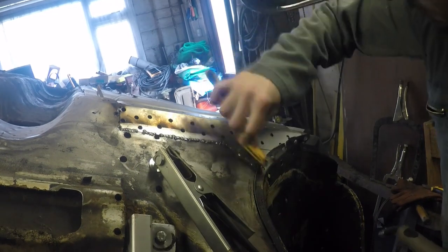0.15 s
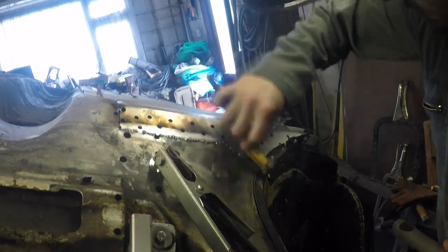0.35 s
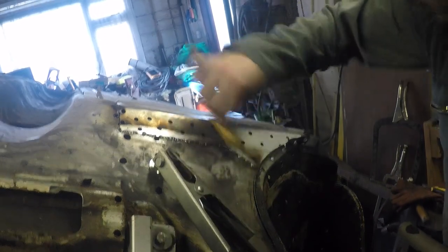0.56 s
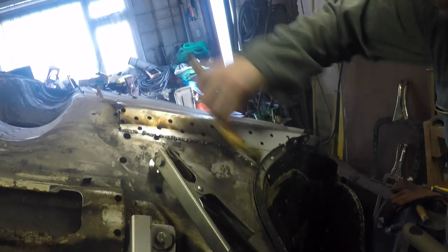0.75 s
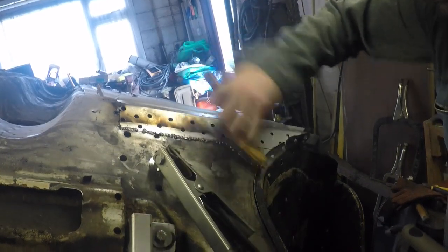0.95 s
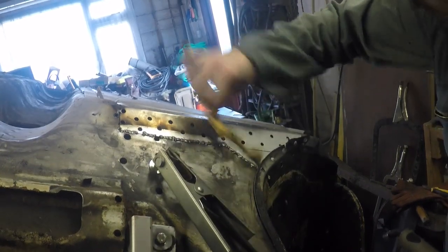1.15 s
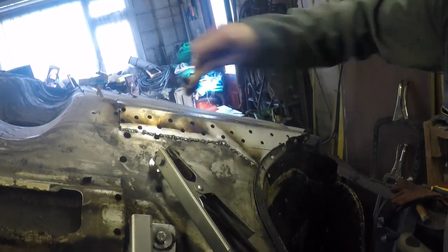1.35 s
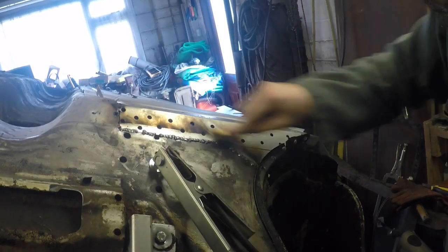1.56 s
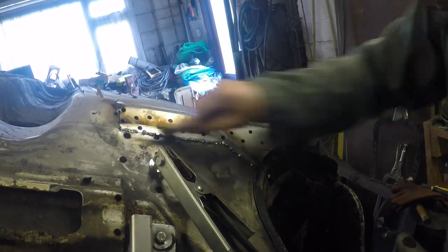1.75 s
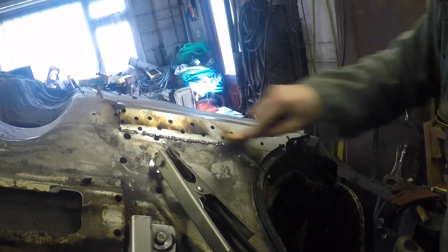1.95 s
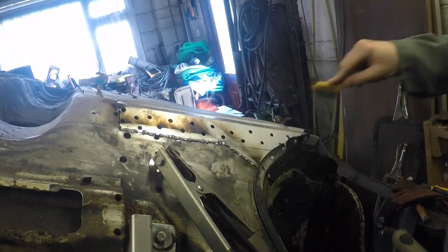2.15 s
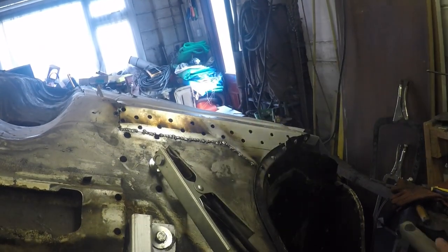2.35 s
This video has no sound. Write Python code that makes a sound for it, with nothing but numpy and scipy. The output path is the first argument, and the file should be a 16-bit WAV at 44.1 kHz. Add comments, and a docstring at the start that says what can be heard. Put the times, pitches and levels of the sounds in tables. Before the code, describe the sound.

A wire brush scrubs quickly over a steel panel, hissing with low metal booms.

```python
"""Wire brush on a steel panel

A hand wire brush scrubs a weld seam on a large steel panel in two bouts, then grazes it once more.
The wire tips pluck the steel so densely that they hiss through its upper resonances. Each turn of the
hand thumps the panel, whose low boom reaches the microphone through the structure.
A faint electrical whine and room rumble lie under it."""
import sys
import numpy as np
from scipy import signal
from scipy.fft import rfft, irfft, next_fast_len
from scipy.io import wavfile
from scipy.ndimage import uniform_filter1d, map_coordinates

SR = 44100
rng = np.random.default_rng(int(sys.argv[2]) if len(sys.argv) > 2 else 0)


def dump(signal):
    """Clip the signal to [-1, 1] and save it as 16-bit WAV at the path in sys.argv[1]."""
    limited = np.clip(np.atleast_2d(signal).T, -1, 1)
    pcm = np.round(limited * 32767).astype(np.int16)
    wavfile.write(sys.argv[1], SR, pcm)


N = 110250

# Course of the scrubbing. Each row: time in seconds, hiss level in dB, relative mid ring in dB.
STROKES = [(0.15, -56.5, -4.5), (0.17, -55.5, -5), (0.18, -53, -6), (0.19, -57, -3), (0.33, -52.5, -6.5),
           (0.45, -55, -3), (0.921, -54.5, -5), (0.931, -51.5, -12), (0.95, -54.5, -3.5),
           (1.01, -54.5, -3.5), (1.089, -53.5, -9), (1.099, -53, -6), (1.14, -54, -4), (1.3, -54.5, -5),
           (1.391, -58.5, -8), (1.42, -76, 5), (1.459, -78, -8), (1.525, -65.5, -2), (1.535, -57, -10),
           (1.59, -52, -3.5), (1.61, -57.5, 3), (1.62, -52.5, -8.5), (1.65, -57.5, -2), (1.66, -55.5, -9),
           (1.68, -51, -4), (1.69, -55, 3), (1.71, -54.5, -6.5), (1.75, -51.5, -10.5), (1.77, -49, -3),
           (1.79, -54, -5.5), (1.84, -52, -6.5), (1.84, -48, -3), (1.869, -50.5, -7.5), (1.91, -57.5, -1.5),
           (1.95, -52.5, -13), (1.969, -52.5, -5), (2.01, -50, -3.5), (2.04, -58, -2), (2.05, -54, -4),
           (2.08, -53.5, -8), (2.12, -54, -6), (2.14, -49, -4), (2.184, -47.5, -0.5), (2.22, -84, 9),
           (2.26, -88, 17)]
# The brush halts to turn. Each row: time in seconds, depth of the dip in dB.
HALT_DIPS = [(.38, 2), (0.754, 4.5), (.92, 0.5), (1.065, 4), (1.151, 6), (1.235, 0), (1.565, 6), (1.61, 3),
             (1.65, 1), (1.695, 4), (1.742, 2), (1.791, 1.5), (1.845, 8.5), (1.905, 4), (1.972, 6),
             (2.04, 0.5), (2.113, 5)]
# Drive of the low modes. Each row: time in seconds, level in dB.
RUMBLE_DRIVE = [(0.0, -37), (0.01, -49.5), (0.19, -49.5), (0.25, -42.5), (0.46, -39), (0.58, -45.5),
                (0.6, -51), (0.62, -44.5), (1.1, -41), (1.12, -45), (1.24, -42.5), (1.47, -49.5),
                (1.83, -42), (1.87, -42), (1.91, -47.5), (1.92, -34.5), (1.93, -44), (1.96, -39),
                (2.07, -48), (2.08, -37), (2.17, -40.5), (2.19, -34.5), (2.21, -42.5), (2.28, -41),
                (2.3, -42), (2.5, -74)]
# Panel modes in four registers. Each row: frequency in Hz, bandwidth in Hz, gain in dB.
HIGH_MODES = [(3613, 360, -5.5), (4410, 170, -8), (5300, 440, -15), (5900, 150, -6), (6290, 190, -6),
              (7420, 150, -8.5), (8180, 430, -7), (9120, 380, -8), (10440, 360, -11), (12100, 320, -6),
              (12340, 510, -2.5), (12800, 500, -18), (15100, 390, -10)]
MID_MODES = [(1080.4, 28, -1), (1298, 49, -3), (1401, 46, -1), (1486, 27, 6), (1541, 20, 2.5),
             (1642, 14.4, 4.5), (1758, 11, 0.5), (1860, 50, -5.5), (2048, 55, -2), (2191, 42, 2),
             (2333, 60, 3), (2450, 38, -5), (2581, 38.4, 5.5)]
LOW_MODES = [(50, 6.3, -10.5), (84.4, 14.3, -2.5), (201.2, 6.3, 0.5), (224.3, 9, -0.5), (253.1, 7.3, 2.5),
             (303.4, 8.1, 0.5), (329.9, 6.5, 1), (356.8, 7.2, 1.5), (394.1, 9.6, -5), (456.6, 33, -17),
             (517.7, 6.9, -6), (564, 22, -17.5), (675.6, 10.2, -11), (722.5, 24, -17), (764.4, 15, -16.5)]
BOOM_MODES = [(107.8, 8.5, -6), (128, 6.45, -0.5), (146.1, 6.05, 0)]
# Bristle spectrum, and its change once the brush is sideways. Each row: frequency in Hz, gain in dB.
BRISTLE_SPECTRUM = [(1530, -10), (2600, -21), (3000, -19.5), (3560, -3), (5000, -10), (6220, -1.5),
                    (6960, -16.5), (8080, -10), (10900, -12), (12500, 5), (15700, -9)]
SIDEWAYS_COLOUR = [(3000, 1.5), (4200, 2), (5200, 3), (6000, -2), (6500, 3.5), (7300, 0), (9000, 0.5),
                   (11600, 3.5), (12500, -1), (15000, 1.5)]
# Turns of the hand. Each row: start in seconds, relative boom level in dB, boom pitch in Hz,
# relative thud level in dB, boom T60 in seconds, lead of the damping in seconds.
HAND_TURNS = [(0.101, -27.5, 153.1, -52, 0.12, 0.012), (0.169, -33.5, 131.2, -54, 0.83, 0.013),
              (0.202, -27.5, 132.8, -63, 1, 0.013), (0.258, -24.5, 130.9, -40, 1, 0.0089),
              (0.31, -19.5, 127.5, -31, 0.7, 0.0091), (0.376, -18, 128.3, -50, 0.32, 0.043),
              (0.44, -15, 136.4, -27, 0.16, 0.029), (0.478, -19.5, 125.2, -48, 0.49, 0.01),
              (0.537, -19, 137.8, -33, 0.57, 0.0097), (0.595, -21.5, 131.8, -54, 1, 0.016),
              (0.639, -22.5, 121.9, -56, 1, 0.015), (0.689, -19, 133.9, -30.5, 0.4, 0.021),
              (0.74, -27.5, 121.8, -41, 0.47, 0.012), (0.805, -12.5, 137.3, -35, 0.17, 0.023),
              (0.857, -14, 136.6, -31, 0.23, 0.031), (0.918, -17, 140.7, -29, 0.22, 0.0055),
              (0.972, -13, 132.4, -41, 0.16, 0.034), (1.029, -22.5, 133, -28, 0.22, 0.0075),
              (1.077, -13, 127.3, -41, 0.23, 0.029), (1.138, -17.5, 137.7, -28, 0.42, 0.0054),
              (1.195, -29.5, 127, -29.5, 0.28, 0.0077), (1.256, -17.5, 140.5, -53, 0.34, 0.0082),
              (1.312, -23, 135.2, -31.5, 0.37, 0.018), (1.4, -30, 139.5, -31.5, 0.33, 0.015),
              (1.485, -32.5, 142.3, -39, 0.42, 0.015), (1.571, -34.5, 142.7, -38, 0.75, 0.0097),
              (1.618, -33, 115.5, -35.5, 0.54, 0.0072), (1.725, -46, 148.1, -31.5, 0.61, 0.014),
              (1.812, -29, 125.9, -38, 0.33, 0.018), (1.922, -21.5, 121.1, -37, 0.43, 0.033),
              (1.945, -28, 152.4, -55, 0.29, 0.011), (2.05, -32.5, 117, -37, 0.58, 0.0092),
              (2.077, -36.5, 150, -54, 0.36, 0.016), (2.185, -22, 140, -69, 0.66, 0.033),
              (2.225, -35, 121.8, -57, 0.49, 0.012), (2.3, -28.5, 140.4, -42, 0.19, 0.017),
              (2.366, -40.5, 113.4, -42, 0.4, 0.014)]
# Single modes caught by a wire. Each row: start in seconds, frequency in Hz, level in dB.
CAUGHT_MODES = [(1.632, 1475, -50.5), (1.757, 1490, -43.5), (1.86, 2560, -52), (2.182, 2357, -42.5),
                (2.315, 1760, -46.5)]
# Two lists: a faint opening scrape; then the rasp of the last stroke and a light closing graze.
# Each row: time in seconds, level in dB.
SCRAPE_ENVELOPES = [
    [(0.0, -58), (0.036, -80), (0.054, -83), (0.08, -88)],
    [(2.13, -81), (2.175, -52), (2.195, -54), (2.214, -70), (2.26, -89), (2.272, -57.5), (2.298, -61.5),
     (2.312, -51.5), (2.332, -51.5), (2.386, -103), (2.4, -89)],
]
# Resonances of the scrapes. Each row: frequency in Hz, bandwidth in Hz, gain in dB.
SCRAPE_MODES = [(2250, 60, -6), (3500, 450, -5), (4800, 170, -2), (6300, 150, -2), (7700, 150, -4),
                (9700, 200, -10)]
# Friction noise of the scrapes. Each row: frequency in Hz, relative density in dB.
SCRAPE_SPECTRUM = [(530, -18), (900, 0.5), (2260, -0.5), (2700, -8), (3520, 4.5), (5600, -29), (7000, -37),
                   (15700, -48)]
# The brush back on steel. Each row: frequency in Hz, level in dB, T60 in seconds.
KNOCK_MODES = [(300, -24.5, 0.1), (510, -34, .06), (757, -40.5, 0.17)]
# Background noise. Each row: frequency in Hz, relative density in dB.
ROOM_SPECTRUM = [(18, -52), (50, -5.5), (90, -14.5), (140, -2), (400, -23), (625, -35.5), (813, -41),
                 (1270, -49), (7800, -56), (8500, -45.5), (9200, -54.5), (11700, -48), (12500, -47),
                 (13300, -47), (15700, -63)]
# Electrical tones. Each row: frequency in Hz, relative level in dB.
WHINE_TONES = [(2116, -78), (6352, -87)]

TOUCH_S, SIDEWAYS_S, KNOCK_S = 0.1468, 1.47, 2.181
PLUCKS_PER_S, PLUCK_SPREAD_DB, FLUTTER_DB = 6000, 4, 0.5
TIME = np.arange(N) / SR


def bristle_hiss():
    """Shot noise: dense plucks of the wire tips merge into a hiss, filtered by the upper modes."""
    sizes = amp(PLUCK_SPREAD_DB * np.minimum(rng.exponential(size=N), 4.5))
    plucks = (rng.random(N) < PLUCKS_PER_S / SR) * sizes * rng.choice([-1, 1], N)
    tips = unit(unit(plucks) + 1.9 * rng.standard_normal(N)) * amp(FLUTTER_DB * wobble(44.58))
    hiss = blended(tips, HIGH_MODES) + amp(-7.5) * coloured(tips, BRISTLE_SPECTRUM)
    hiss = wandering_contact(fine_modes(hiss))
    # In the second bout the brush is turned and its wires catch in spurts.
    sideways = unit(coloured(hiss, SIDEWAYS_COLOUR) * amp(wobble(82)))
    return np.where(TIME < SIDEWAYS_S, hiss, sideways)


def fine_modes(x, spacing_hz=25, spread_db=2):
    """High modal density: the sheet's countless small modes give a jagged, random response."""
    knots = rng.standard_normal(SR)
    return unit(filtered(x, lambda hz: amp(spread_db * map_coordinates(knots, [hz / spacing_hz]))))


def wandering_contact(x, spread_db=1):
    """Coupling depends on where the wires land, so patches of gain wander over time and frequency."""
    spectra = signal.stft(x, nperseg=256)[2]
    patches = uniform_filter1d(rng.standard_normal(spectra.shape), size=4, axis=0)
    patches = uniform_filter1d(patches, size=8, axis=1)
    return unit(signal.istft(spectra * amp(spread_db * unit(patches)), nperseg=256)[1][:N])


def scrubbing():
    """Forced vibration: the strokes set the level of the hiss and drive the mid and low modes."""
    hiss_db, ring_db = curves([(TOUCH_S, *STROKES[0][1:])] + list(STROKES))
    hiss_db -= sum(db * np.exp(-((TIME - at) / 0.0055) ** 2) for at, db in HALT_DIPS)
    rumble_db, = curves(RUMBLE_DRIVE)
    hiss = amp(hiss_db) * bristle_hiss()
    ring = driven(MID_MODES, hiss_db + ring_db - 1 + FLUTTER_DB * wobble(30.2))
    rumble = driven(LOW_MODES, rumble_db + 0.95 * wobble(23.28))
    boom = driven(BOOM_MODES, rumble_db - 1)
    return hiss + ring + rumble + boom


def panel_booms(rise_s=0.008, damp_s=0.023, longest_s=0.086, glide_hz=8):
    """Contact damping: each turn of the hand swells a boom of rising pitch, damped as the next nears."""
    starts, db, hz, _, t60, lead = np.transpose(HAND_TURNS)
    lengths = np.minimum(np.diff(starts, append=N / SR), longest_s)
    envelope, t = np.zeros(N + SR), np.arange(SR // 2) / SR
    for k, start in enumerate(starts):
        damped_for = np.maximum(t - lengths[k] + lead[k] - rise_s, 0)
        damping = np.exp(-(damped_for / damp_s) ** 2)
        swell = onset(t, rise_s) * amp(db[k] - 0.5 - 60 * t / t60[k])
        envelope[round(start * SR):][:len(t)] += swell * damping
    glide_times = np.ravel([starts, starts + 0.95 * lengths], 'F')
    glide_pitches = np.ravel([hz - glide_hz, hz + glide_hz], 'F')
    pitch = np.interp(TIME, glide_times, glide_pitches)
    return envelope[:N] * np.sin(2 * np.pi * np.cumsum(pitch) / SR)


def deep_thuds():
    """Impulse response: each turn of the hand also sets off two deep, decaying vibrations."""
    out, t = np.zeros(N + SR), np.arange(SR // 2) / SR
    thud = onset(t, 0.008) * damped_sine(t, hz=50.7, db=1.5, t60=0.31)
    push = (1 - np.exp(-t / 0.0017)) * damped_sine(t, hz=77, db=5.5, t60=0.087)
    for start, _, _, thud_db, _, _ in HAND_TURNS:
        out[round(start * SR):][:len(t)] += amp(thud_db) * (thud + push)
    return out[:N]


def pings(rise_s=0.0068, t60=0.14):
    """Free vibration: a single panel mode is caught and rings briefly, its phase wavering."""
    out, t = np.zeros(N + SR), np.arange(SR // 4) / SR
    rise = 1 - np.exp(-t / rise_s)
    for start, hz, db in CAUGHT_MODES:
        waver = np.cumsum(rng.normal(0, 0.047, len(t)))
        out[round(start * SR):][:len(t)] += rise * damped_sine(t, hz, db, t60, waver)
    return out[:N]


def scrapes():
    """Sliding friction: darker noise gives the opening scrape, last stroke's rasp and closing graze."""
    envelope = sum(amp(curves(rows)[0]) for rows in SCRAPE_ENVELOPES)
    ring = blended(rng.standard_normal(N), SCRAPE_MODES)
    friction = amp(1.5) * coloured(rng.standard_normal(N), SCRAPE_SPECTRUM)
    return envelope * unit(ring + friction)


def knock():
    """Impact excitation: the brush back strikes the steel once and three modes decay."""
    t = np.maximum(TIME - KNOCK_S, 0)
    return onset(t, 0.003) * sum(damped_sine(t, hz, db, t60) for hz, db, t60 in KNOCK_MODES)


def background(noise_db=-47):
    """Stationary noise floor: room rumble and microphone hiss, with a thin electrical whine."""
    whine = sum(amp(db + 2) * np.sin(2 * np.pi * hz * TIME) for hz, db in WHINE_TONES)
    return amp(noise_db) * coloured(rng.standard_normal(N), ROOM_SPECTRUM) + whine


def amp(db):
    """Amplitude ratio of a level in dB."""
    return 10 ** (np.asarray(db) / 20)


def unit(x):
    """Normalisation to an rms of 1."""
    return x / np.sqrt(np.mean(x ** 2) + 1e-20)


def onset(t, rise_s):
    """Gaussian rise from 0 to 1."""
    return 1 - np.exp(-(t / rise_s) ** 2)


def damped_sine(t, hz, db, t60, phase=0):
    """Exponential decay of one mode, by 60 dB in t60 seconds."""
    return amp(db - 60 * t / t60) * np.sin(2 * np.pi * hz * t + phase)


def wobble(rate):
    """Smooth random modulation with rate knots a second."""
    return map_coordinates(rng.standard_normal(int(N * rate / SR) + 4), [TIME * rate])


def curves(rows):
    """Linear interpolation of each dB column over time, at -120 dB outside the rows."""
    times, *columns = np.transpose(rows)
    return [np.interp(TIME, times, db, left=-120, right=-120) for db in columns]


def filtered(x, response):
    """Linear filtering: the spectrum of x is multiplied by a frequency response."""
    size = next_fast_len(N + SR // 2)
    return irfft(rfft(x, size) * response(np.fft.rfftfreq(size, 1 / SR)), size)[:N]


def coloured(x, points):
    """Spectral shaping by (Hz, dB) points on a log frequency axis, at an rms of 1."""
    hz, db = np.transpose(points)
    return unit(filtered(x, lambda f: amp(np.interp(np.log(f + 1), np.log(hz), db))))


def resonant(x, modes):
    """Modal superposition: second-order resonances add with alternating signs."""
    def response(f):
        return sum((-1) ** k * amp(db) * 1j * f * width / (hz * hz - f * f + 1j * f * width)
                   for k, (hz, width, db) in enumerate(modes))
    return filtered(x, response)


def blended(x, modes):
    """Incoherent summation: overlapping resonances add in power, leaving no notches between."""
    def power(f):
        return sum(amp(2 * db) * (f * width) ** 2 / ((hz * hz - f * f) ** 2 + (f * width) ** 2)
                   for hz, width, db in modes)
    return unit(filtered(x, lambda f: np.sqrt(power(f))))


def driven(modes, level_db):
    """Resonators store energy: noise is given its level before it enters them, so they ring on."""
    noise = rng.standard_normal(N)
    return resonant(noise * amp(level_db), modes) / np.std(resonant(noise, modes))


def scene():
    """Superposition of all sources in one channel."""
    return (scrubbing() + panel_booms() + deep_thuds() + pings() + scrapes() + knock()
            + background())[None]


def record(dry, low_cut_hz=54, top_hz=15790):
    """Band limiting: the microphone rolls off the deepest bass and passes nothing above its limit."""
    return filtered(dry[0], lambda hz: (hz < top_hz) * hz ** 2 / np.sqrt(hz ** 4 + low_cut_hz ** 4))[None]


dry = scene()
out = record(dry)
dump(out)
```